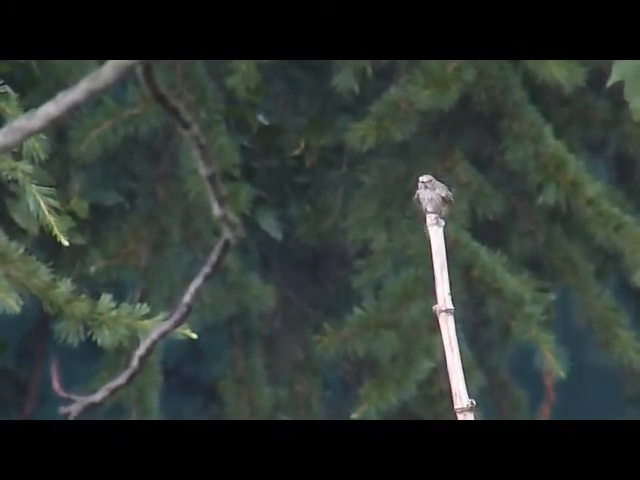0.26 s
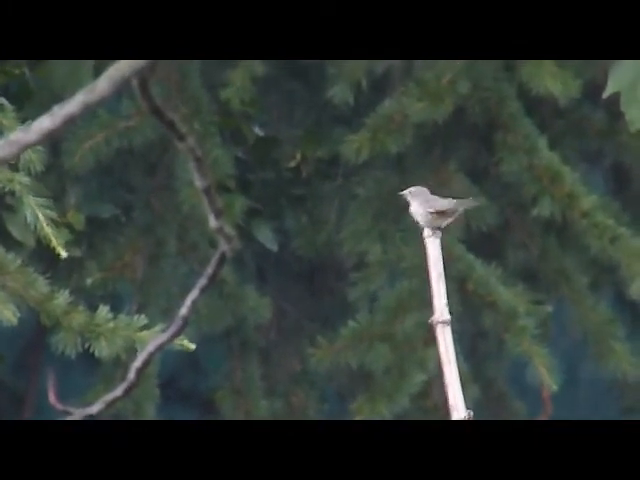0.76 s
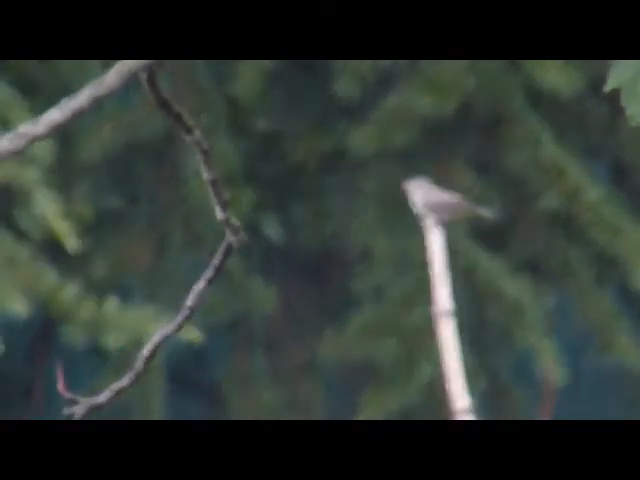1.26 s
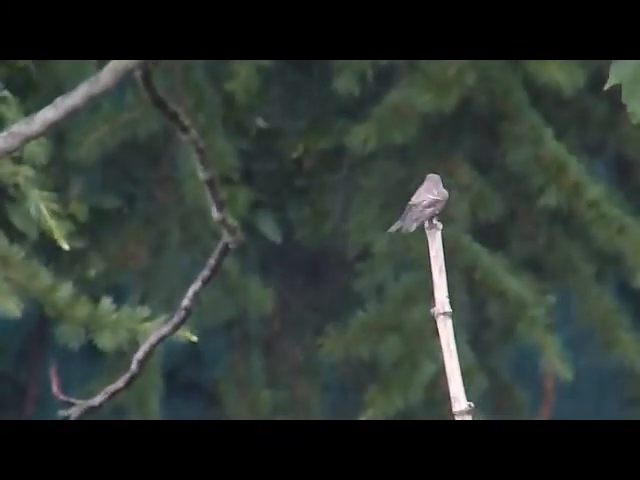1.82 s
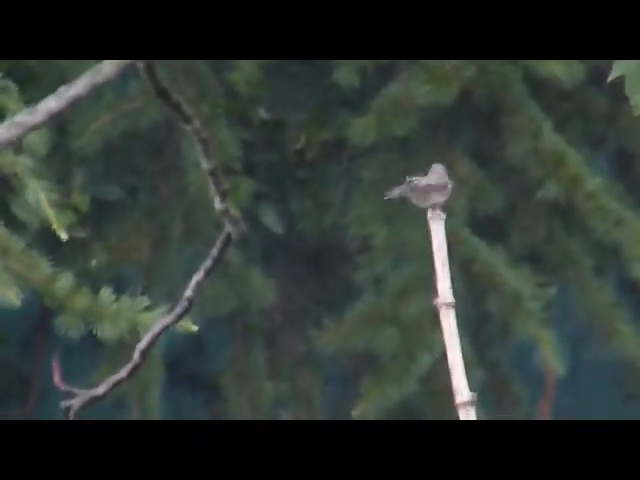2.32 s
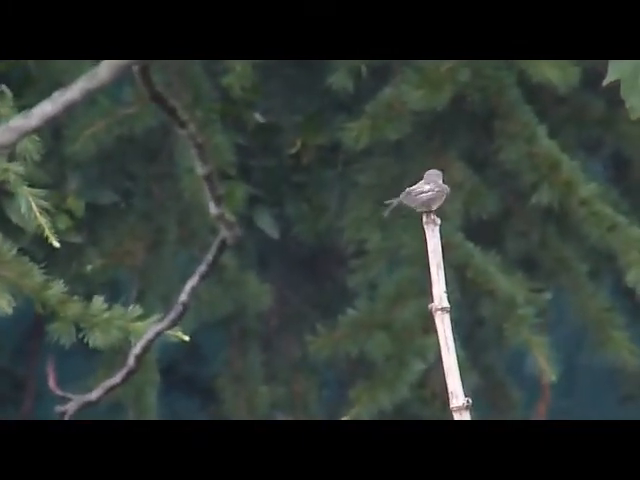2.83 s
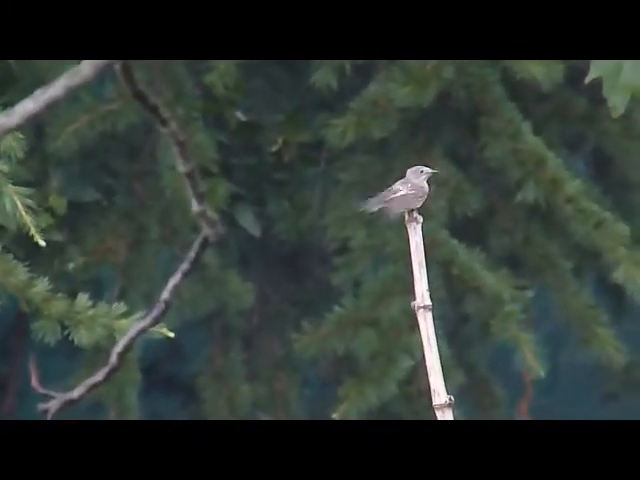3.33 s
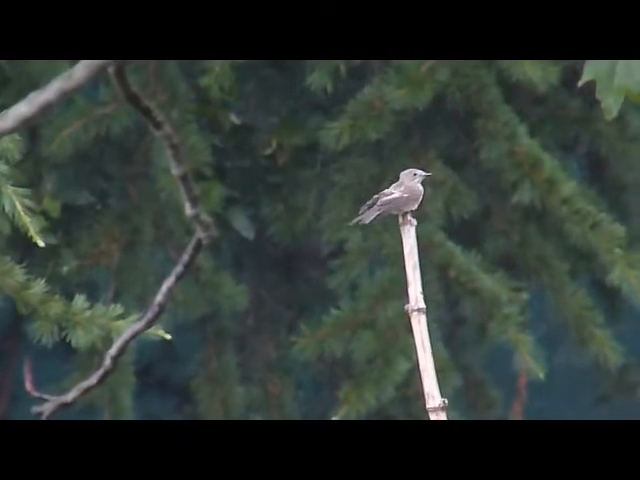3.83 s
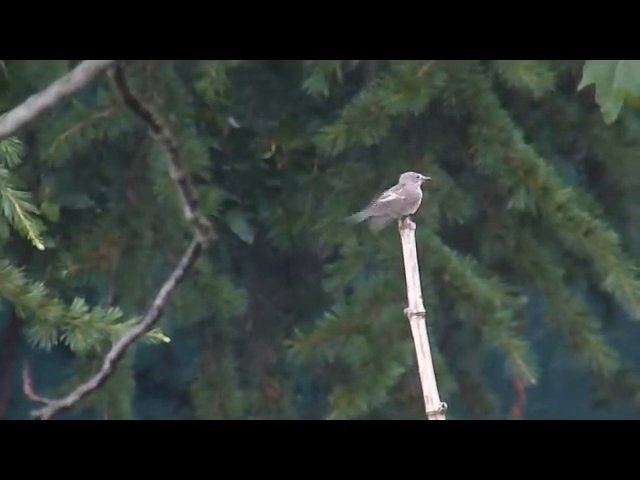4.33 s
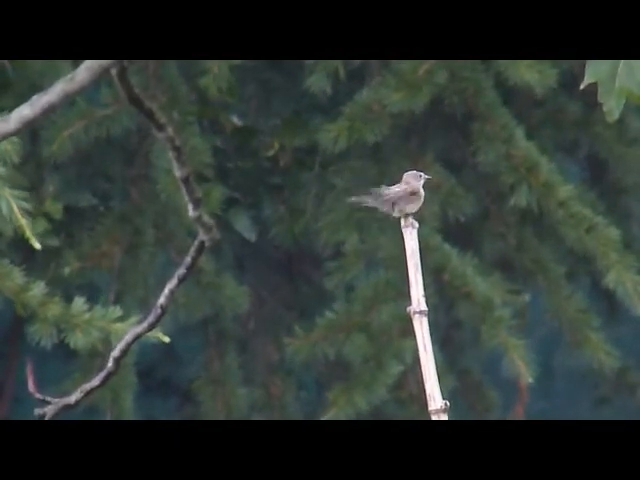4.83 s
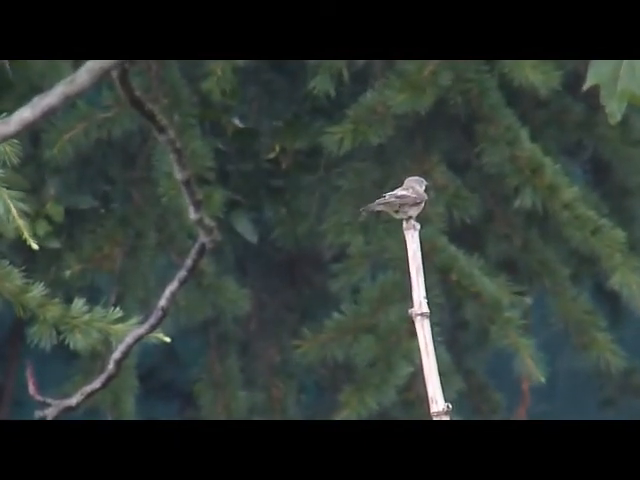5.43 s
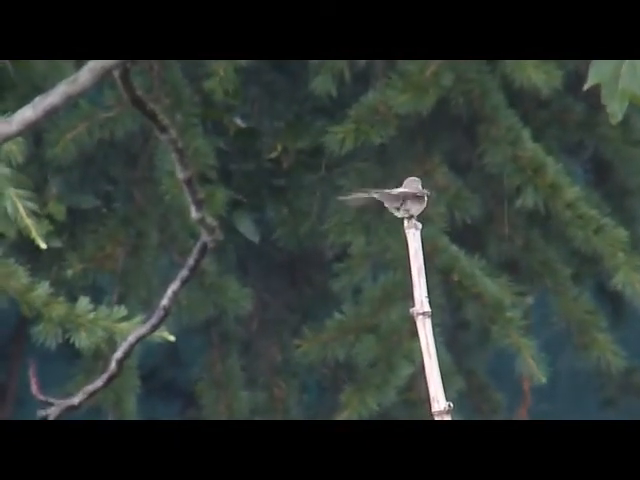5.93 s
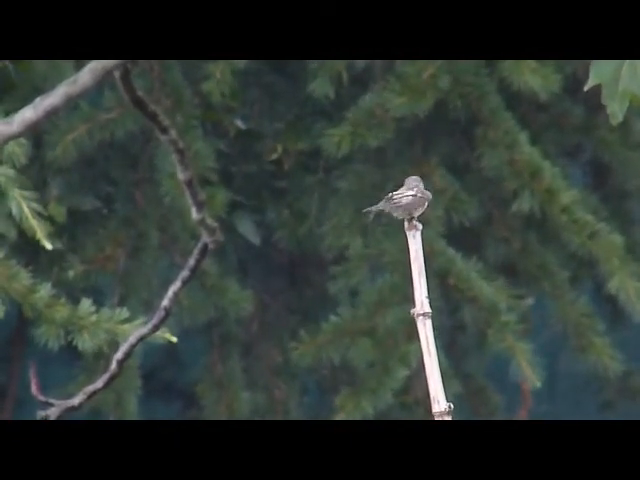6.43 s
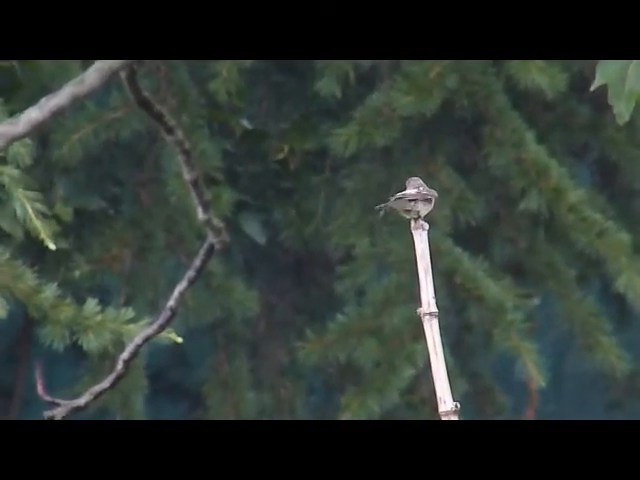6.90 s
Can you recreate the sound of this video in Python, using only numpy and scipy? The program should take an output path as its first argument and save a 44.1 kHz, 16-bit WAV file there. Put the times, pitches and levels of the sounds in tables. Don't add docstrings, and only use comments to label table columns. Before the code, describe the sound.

Steady rain hisses softly and evenly on garden foliage, with a lower, duller patter on the ground, for about seven seconds. From the start a very low, blurred rumble of distant thunder lies beneath it, with faint rolls rising and sinking. A hollow drip falls at about 1.1 s and a crisp tick at 1.4 s. Between 2 and 3.6 s, close ticks and rounded plinks cluster, with a sharp bright splash on the right at 2.3 s. Another drip comes at 4.7 s. From about 5.1 s the thunder draws nearer, in uneven boomy, crackling rolls, with a distinct thud near 5.8 s and stronger ones around 6.2 and 6.4 s. It is heaviest from 6.5 to 6.8 s, with a deep blow near 6.75 s, and still rumbles at the end. The rain never changes much. Stereo microphones sit close, under cover, with softened treble.

```python
import sys
import numpy as np
from scipy import signal
from scipy.fft import rfft, irfft, next_fast_len
from scipy.io import wavfile
from scipy.ndimage import uniform_filter1d, map_coordinates

SR = 44100
rng = np.random.default_rng(int(sys.argv[2]) if len(sys.argv) > 2 else 0)


def how_loud(loudness_db):
    steps = np.asarray(loudness_db, float) / 20
    return 10 ** steps


def transcribe(u):
    v = np.clip(np.atleast_2d(u).T, -1, 1)
    q = np.round(v * 32767).astype(np.int16)
    wavfile.write(sys.argv[1], SR, q)


N = 315749


def unit(x):
    return x / np.sqrt(np.mean(x ** 2) + 1e-20)


def along(points, hz):
    f, v = np.transpose(points)
    return np.interp(np.log(hz + 1), np.log(f + 1), v)


def curves(rows):
    s, *columns = np.transpose(rows)
    return [np.interp(np.arange(N) / SR, s, column) for column in columns]


def filtered(x, response):
    m = next_fast_len(N + SR // 2)
    return irfft(rfft(x, m) * response(np.fft.rfftfreq(m, 1 / SR)), m)[..., :N]


def shaped(spectrum):
    return lambda hz: how_loud(along(spectrum, hz))


def modes(table):
    def gain(f):
        power = 0
        for centre, width, db in table:
            power = power + how_loud(2 * db) / (1 + ((f - centre) / (width / 2)) ** 2) ** 2
        return np.sqrt(power)
    return gain


def impacts(per_second, spread_db, share):
    when, size = rng.random(N), rng.random(N)
    struck = (when < per_second / SR) * how_loud(spread_db * size)
    near = unit(struck * rng.standard_normal((2, N)))
    far = rng.standard_normal((2, N))
    return np.sqrt(share) * near + np.sqrt(1 - share) * far


# pitch_hz, coherence (0 to 1)
COHERENCE = [(60, 1.0), (120, 1.0), (230, 1), (460, 0.99), (910, 0.89), (1800, 0.56), (3560, 0.28),
             (7020, 0.57)]
# pitch_hz, left_lead_rad
LEFT_LEAD = [(0, 0), (1290, 0), (1720, 0.82), (7150, 0.44)]
# pitch_hz, left_minus_right_db
LEFT_EXCESS = [(60, .1), (300, .3), (700, -.3), (1400, -1.7), (2500, -2.6), (4200, -1.2), (7000, 0)]


def ports(pair, colour):
    def turn(hz):
        return np.arccos(np.clip(along(COHERENCE, hz), -1, .9988)) / 2

    def skew(hz):
        return how_loud(along(LEFT_EXCESS, hz) / 2) * np.exp(.5j * along(LEFT_LEAD, hz))

    mid, side = filtered(pair, lambda hz: colour(hz) * [np.cos(turn(hz)), np.sin(turn(hz))])
    both = filtered(np.array([mid + side, mid - side]), lambda hz: [skew(hz), 1 / skew(hz)])
    return both / np.std(both.mean(0))


def steadied(pair, seconds):
    power = uniform_filter1d(pair.mean(0) ** 2, int(seconds * SR))
    power = uniform_filter1d(power, int(seconds * SR))
    return pair / np.sqrt(np.abs(power) + 0.04)


def swells(rows, table, spread_oct):
    peak_s, db, hz, half_s = np.transpose(rows)[..., None]
    centre_hz = np.exp(np.mean([np.log(mode[0]) for mode in table]))
    step = np.arange(0, N + 64, 64)
    since = (step / SR - peak_s) / half_s
    away = np.where(since < 0, -since, since / 0.85)
    shape_db = -10 * away ** 1.47
    off_db = -6 * (np.log2(hz / centre_hz) / spread_oct) ** 2
    return np.interp(np.arange(N), step, how_loud(2 * (db + shape_db + off_db)).sum(0))


def wobble(rate):
    knots = rng.standard_normal(int(N * rate / SR) + 2)
    return map_coordinates(knots, [np.arange(N) * rate / SR])


def patches(pair, depth_db):
    z = signal.stft(pair, nperseg=512)[2]
    field = uniform_filter1d(rng.standard_normal(z.shape[1:]), size=7, axis=0)
    field = uniform_filter1d(field, size=12, axis=1)
    return signal.istft(z * how_loud(depth_db * unit(field)), nperseg=512)[1][:, :N]


# time_s, level_db, left_minus_right_db
RAIN_STRENGTH = [(0.0, -34.5, -1.5), (0.8, -35, -1), (1.54, -34, -2.5), (1.87, -34.4, -2.5),
                 (2.43, -34.5, -1.1), (3.39, -35, -1.3), (3.81, -34.5, -1.5), (4.17, -35.5, -1.5),
                 (4.5, -34.5, -1.5), (5.14, -35, -0.5), (6.44, -35, -1), (7.16, -36, -0.8)]
# pitch_hz, density_db (per Hz)
LEAF_HISS = [(900, -16), (1300, -4), (1800, -1), (3000, -2.5), (6050, -5.5), (6940, -12.5), (7470, -27.5),
             (16400, -120)]
# pitch_hz, density_db (per Hz)
GROUND_PATTER = [(280, -30), (480, -1.5), (650, 0.5), (1000, 0), (1300, -3), (1800, -14), (2600, -32.5),
                 (4000, -120)]


def rain():
    hiss_db, pan_db = curves(RAIN_STRENGTH)
    mean_db = hiss_db.mean()
    patter_db = mean_db - 3 + 0.8 * (hiss_db - mean_db)
    sheet = wobble(rate=13)
    leaves = patches(impacts(500, spread_db=8, share=.05), depth_db=.8)
    ground = patches(impacts(200, spread_db=10, share=0.039), depth_db=0.58)
    hiss = how_loud(hiss_db + 0.3 * sheet) * ports(leaves, shaped(LEAF_HISS))
    patter = how_loud(patter_db + 0.31 * sheet) * ports(ground, shaped(GROUND_PATTER))
    drift_db = (pan_db - pan_db.mean()) / 2
    return hiss * how_loud([drift_db, -drift_db]) + patter


# pitch_hz, width_hz, level_db
SHELTER_MODES = [
    [(118, 30, -12.5), (150, 21, 0), (169, 16, 1)],
    [(210.6, 37, -3.5), (251.7, 30, -4.5)],
    [(334.5, 44, -4.5), (384, 35, -1.5), (426.3, 25, -2.5)],
    [(494, 32, -3), (549, 36, 3.5), (626, 61, -2), (730, 89, -9.5), (922, 200, -9)],
]
GROUP_LEVELS = [-3, -2, 2, 0.5]
# time_s, roll_db
APPROACH = [(0, -54.5), (0.6, -49), (1.3, -53.5), (2.0, -50), (2.4, -47.5), (2.9, -48.5), (4.2, -53),
            (5.0, -48.5), (5.3, -45), (5.9, -41), (6.3, -43), (6.6, -36.5), (7.16, -35)]
# peak_s, level_db, favoured_hz, half_length_s
EARLY_ROLLS = [(0.12, -45, 590, .1), (0.3, -43.5, 205, 0.071), (0.52, -49, 150, .1), (0.67, -44, 450, .15),
               (1.43, -43, 230, 0.22), (1.78, -44, 300, .12), (2.3, -40, 295, 0.18), (2.46, -41, 302, 0.17),
               (2.65, -43, 390, 0.13), (3.13, -49, 155, 0.36), (3.51, -44, 278, 0.13),
               (4.18, -48, 500, 0.14), (4.43, -44, 290, .12), (4.74, -45.5, 250, 0.14),
               (4.92, -45, 390, 0.21)]
# peak_s, level_db, favoured_hz, half_length_s
THUNDER_PEALS = [(5.11, -38.5, 150, 0.071), (5.206, -38, 170, 0.051), (5.333, -34.5, 433, 0.09),
                 (5.355, -33.5, 155, .07), (5.468, -30, 161, .08), (5.43, -33.5, 484, 0.1),
                 (5.613, -33, 176, 0.054), (5.619, -35, 574, 0.069), (5.74, -35, 159, 0.065),
                 (5.792, -34, 350, 0.028), (5.93, -35.5, 420, 0.16), (6.086, -36.5, 380, 0.091),
                 (6.167, -35, 155, 0.049), (6.233, -28.5, 408, 0.098), (6.24, -33.5, 165, 0.074),
                 (6.372, -28, 190, 0.031), (6.379, -30, 390, .04), (6.476, -28.5, 290, 0.04),
                 (6.556, -22, 156, 0.044), (6.572, -24, 466, 0.045), (6.64, -27, 332, 0.042),
                 (6.727, -23.5, 208, 0.034), (6.764, -22.5, 150, 0.046), (6.757, -24.5, 410, 0.057),
                 (6.886, -35, 500, 0.078), (6.94, -29, 230, 0.04), (7.0, -28.5, 480, 0.064),
                 (7.06, -25, 380, 0.033), (7.087, -33.5, 165, 0.13), (7.155, -25, 392, 0.032)]


def thunder():
    fronts = impacts(250, spread_db=5, share=0.16)
    roll_db, = curves(APPROACH)
    total = 0
    for db, table in zip(GROUP_LEVELS, SHELTER_MODES):
        power = how_loud(2 * (roll_db + db)) + swells(EARLY_ROLLS + THUNDER_PEALS, table, spread_oct=0.51)
        total = total + np.sqrt(power) * steadied(ports(fronts, modes(table)), seconds=0.066)
    return total


# peak_s, peak_db, pitch_hz
STRONG_FRONTS = [
    (5.788, -20, 332),
    (6.215, -21, 380),
    (6.377, -17, 280),
    (6.755, -12, 200),
]


def claps():
    s, db, hz = np.transpose(STRONG_FRONTS)[..., None]
    out, t = np.zeros(N + SR), np.arange(-1024, 1025) / SR
    fronts = -how_loud(db) * np.cos(2 * np.pi * hz * t) * np.exp(-(t * hz / 0.49) ** 2)
    for peak_s, front in zip(s[:, 0], fronts):
        out[round(peak_s * SR):][:len(t)] += front
    return out[len(t) // 2:][:N]


# peak_s, peak_db, ring_hz, left_minus_right_db
NEAR_TICKS = [(1.4174, -19, 5900, 0), (2.0412, -19.5, 3200, -1), (2.162, -22, 2200, 0),
              (2.4265, -21, 4600, 0), (2.4468, -23.5, 6000, 0), (2.7232, -25, 5700, 0),
              (3.3862, -25, 5000, -1), (6.1494, -24, 5000, 0), (6.278, -23, 4000, -1),
              (6.4747, -24, 4000, -1)]
# peak_s, peak_db, ring_hz, left_minus_right_db
RIGHT_SPLASH = [(2.2873, -10.5, 6000, -15), (2.2885, -11.5, 6100, -12), (2.2895, -13.5, 5800, -15),
                (2.2915, -15, 5800, -15), (2.2884, -16, 1800, 6), (2.2892, -16, 1400, -8),
                (2.2894, -21, 1300, 8), (2.2903, -22, 1200, 5)]
# start_s, level_db (peak is 3.5 dB lower), ring_hz, left_minus_right_db
EAVES_DRIPS = [(1.11, -28, 730, -2), (2.054, -28, 603, -4), (2.135, -24, 1470, -5), (2.55, -21.5, 935, -3),
               (2.774, -33, 1000, -3), (3.009, -23, 664, -3), (3.138, -25, 606, -2),
               (3.267, -26, 964, -1.0), (3.643, -26, 1000, 2), (4.74, -25, 1030, 0)]


def drops():
    out, t = np.zeros((2, N + SR)), np.arange(-512, 513) / SR
    ticks = [(*row, .00027) for row in NEAR_TICKS + RIGHT_SPLASH]
    drips = [(s + 0.00306, db - 3.5, hz, pan_db, .003) for s, db, hz, pan_db in EAVES_DRIPS]
    for s, db, hz, pan_db, swell_s in ticks + drips:
        ring = np.cos(2 * np.pi * hz * t) * np.exp(-(t / swell_s) ** 2)
        gain = how_loud([[db + min(pan_db, 0)], [db - max(pan_db, 0)]])
        out[:, round(s * SR):][:, :len(t)] += gain * ring
    return out[:, len(t) // 2:][:, :N]


# pitch_hz, width_hz, level_db
LOWEST_MODES = [
    [(38.3, 14, -12.5), (56.6, 16, -1.5)],
    [(86, 70, 1.5), (109, 17, -0.5)],
    [(147, 9.8, 0)],
]
RESTING_LEVELS = [-50, -46, -56.5]
# peak_s, level_db, favoured_hz, half_length_s
FAR_SWELLS = [(0.1, -47, 146, 0.41), (0.5, -49, 55, 0.18), (0.7, -41.5, 95, 0.25), (0.87, -42, 146, .12),
              (1.3, -44.5, 146, 0.36), (1.75, -44.5, 146, .15), (1.9, -40, 65, 0.13),
              (2.02, -44.5, 95, .15), (2.27, -42.5, 110, 0.28), (2.45, -47, 60, 0.22),
              (2.78, -43.5, 115, 0.24), (3.12, -41, 60, .2), (3.5, -41, 75, 0.18), (3.98, -42.5, 100, 0.19),
              (4.2, -42, 65, .2), (4.48, -41, 65, 0.24), (4.68, -42.5, 100, 0.17), (4.88, -38.5, 85, .12),
              (5.19, -42, 90, .1), (5.44, -42, 146, .2), (5.6, -40.5, 55, .5), (5.8, -41, 146, 0.37),
              (6.05, -44, 90, .2), (6.35, -42, 146, 0.19), (6.62, -42, 69.7, 0.18), (6.9, -36, 146, 0.4),
              (7.15, -45, 55, .2)]
# pitch_hz, density_db (per Hz)
UPPER_RUMBLE = [(65, -27.5), (110, -3.5), (129, -3), (297, -4.5), (366, -13.5), (480, -14.5), (620, -39.5),
                (1060, -120)]


def storm():
    total = how_loud(-44.0) * ports(rng.standard_normal((2, N)), shaped(UPPER_RUMBLE))
    for db, table in zip(RESTING_LEVELS, LOWEST_MODES):
        power = how_loud(2 * db) + swells(FAR_SWELLS, table, spread_oct=0.59)
        noise = ports(rng.standard_normal((2, N)), modes(table))
        total = total + np.sqrt(power) * steadied(noise, seconds=0.13)
    return total


def scene():
    return rain() + thunder() + claps() + drops() + storm()


def low_pass(x):
    return signal.sosfilt(signal.butter(12, 7620, fs=SR, output="sos"), x)


def record(dry):
    thinned = filtered(dry, lambda hz: hz ** 4 / (24.0 ** 4 + hz ** 4))
    return low_pass(thinned)


dry = scene()
out = record(dry)
transcribe(out)
```